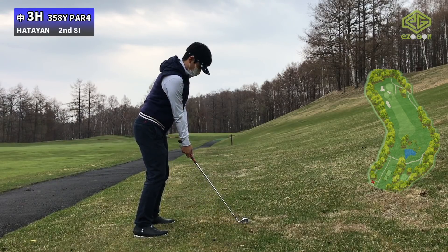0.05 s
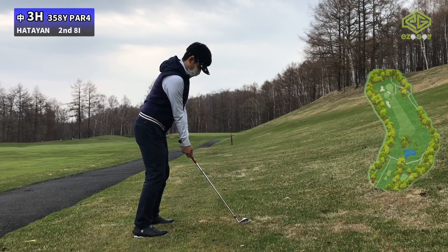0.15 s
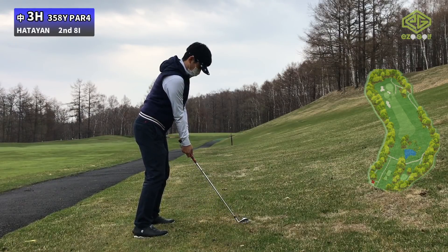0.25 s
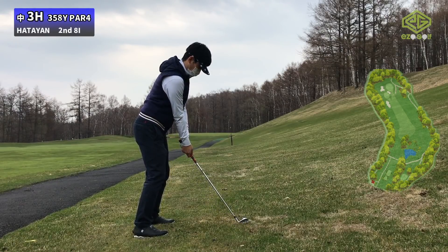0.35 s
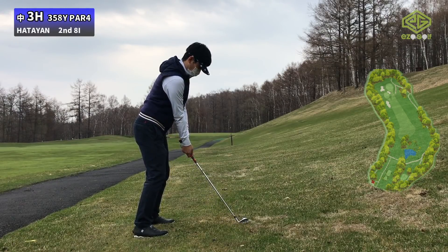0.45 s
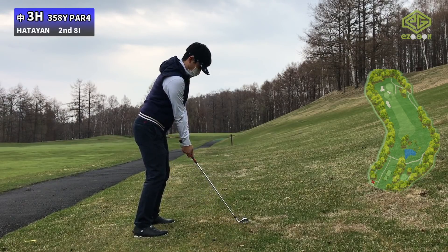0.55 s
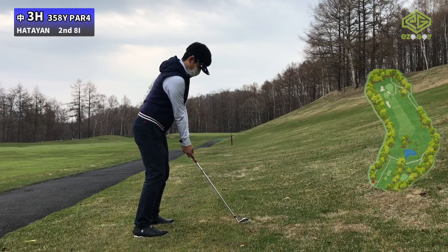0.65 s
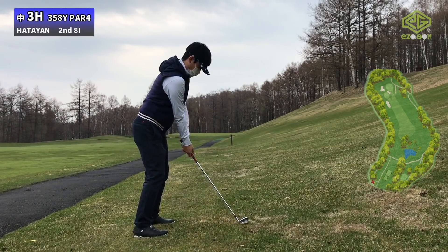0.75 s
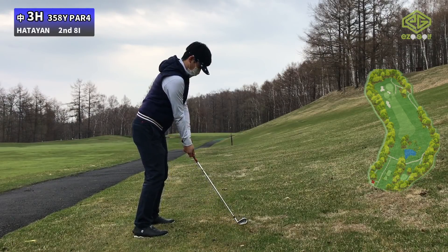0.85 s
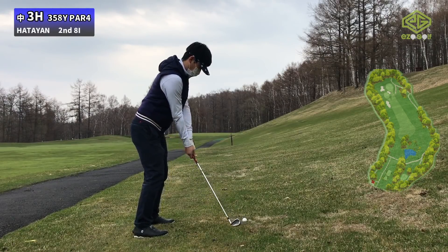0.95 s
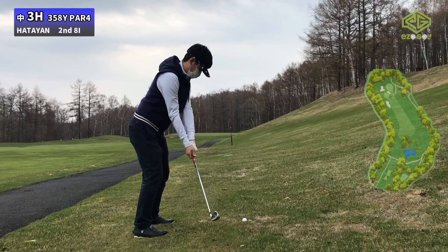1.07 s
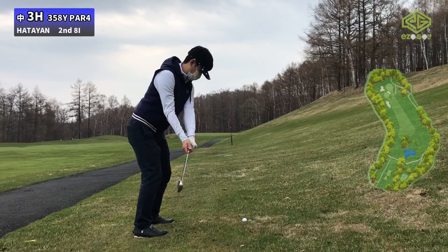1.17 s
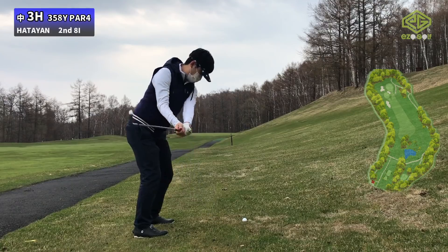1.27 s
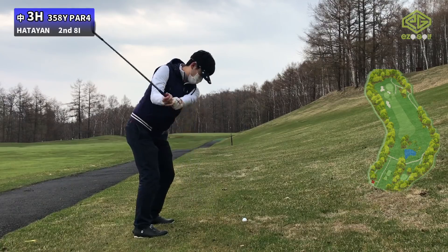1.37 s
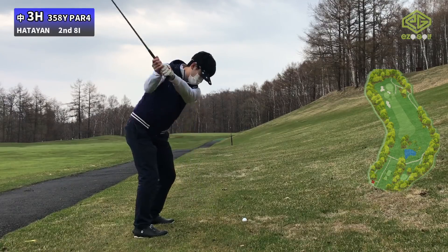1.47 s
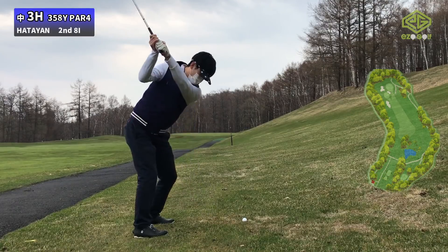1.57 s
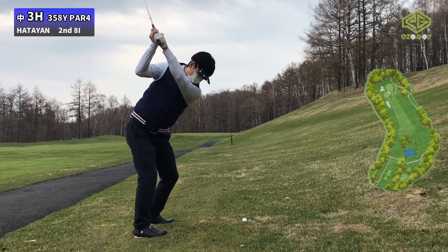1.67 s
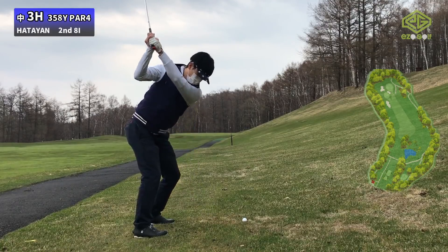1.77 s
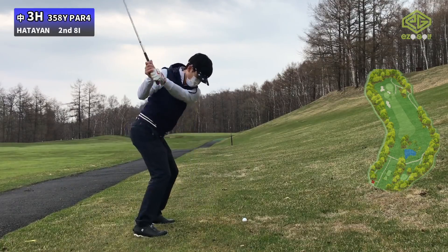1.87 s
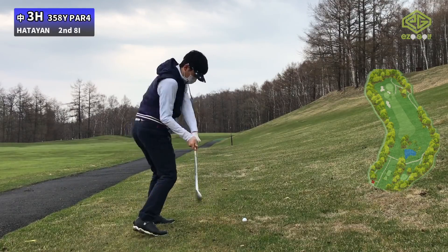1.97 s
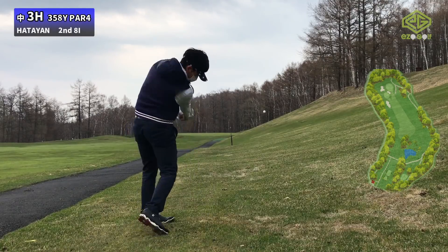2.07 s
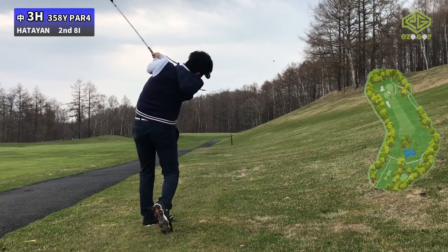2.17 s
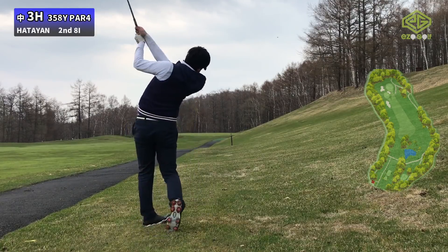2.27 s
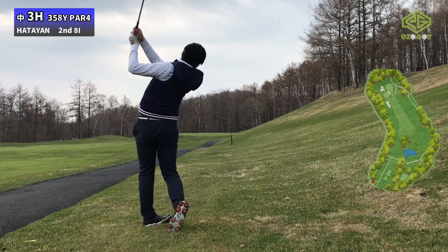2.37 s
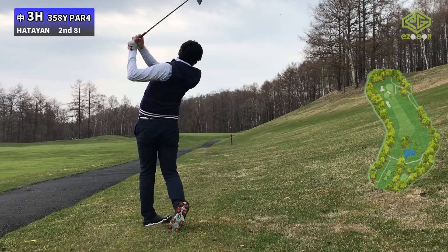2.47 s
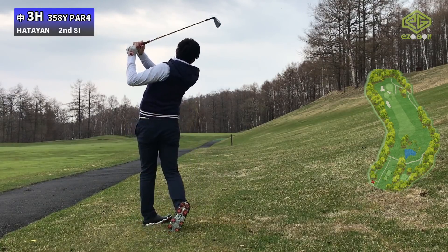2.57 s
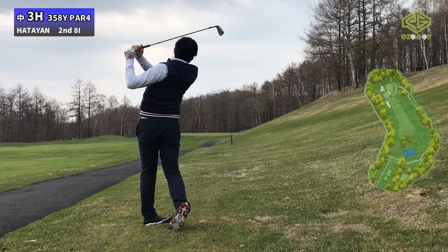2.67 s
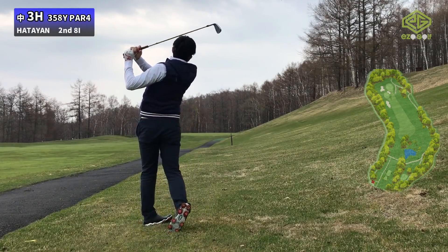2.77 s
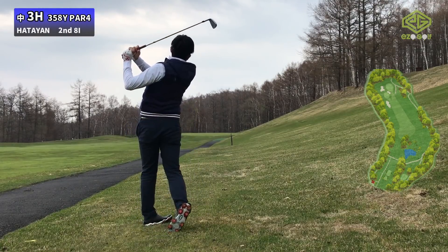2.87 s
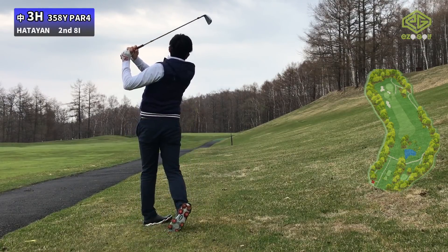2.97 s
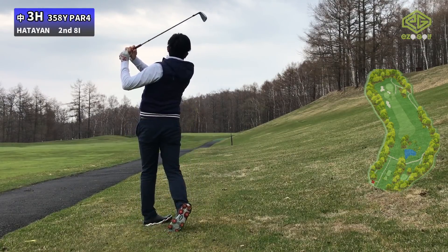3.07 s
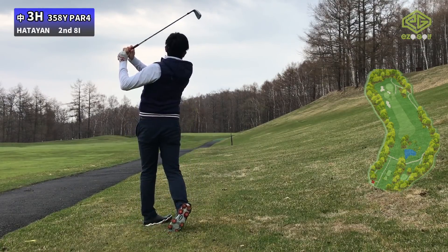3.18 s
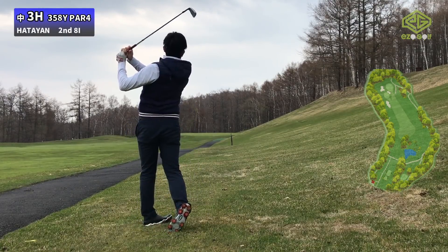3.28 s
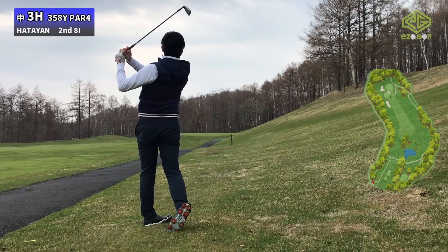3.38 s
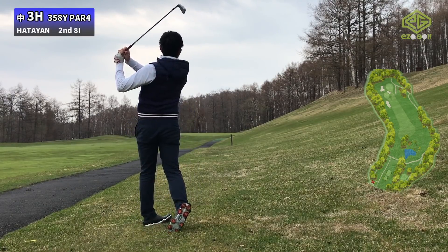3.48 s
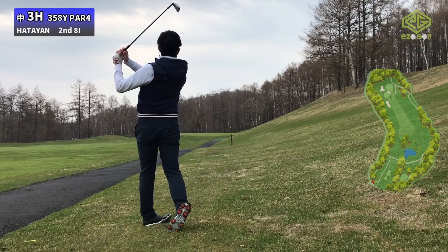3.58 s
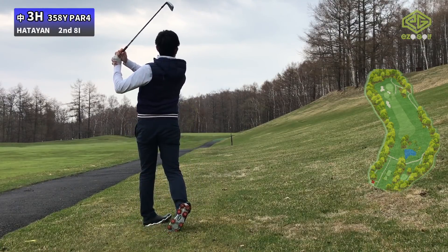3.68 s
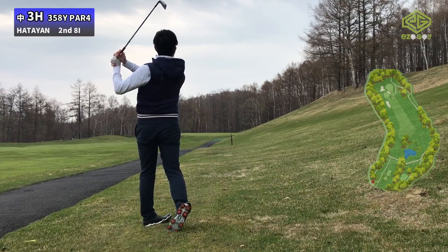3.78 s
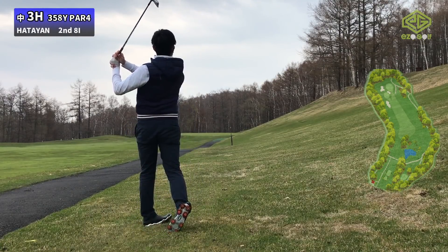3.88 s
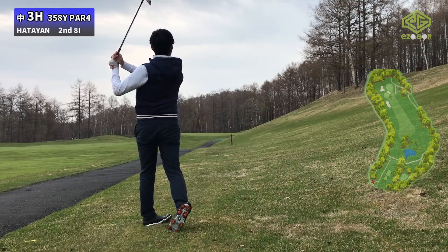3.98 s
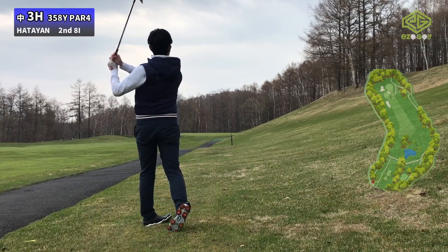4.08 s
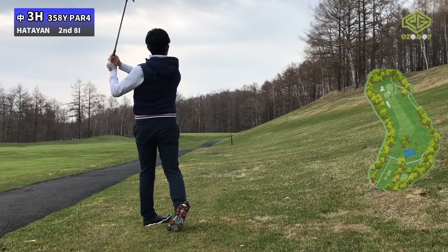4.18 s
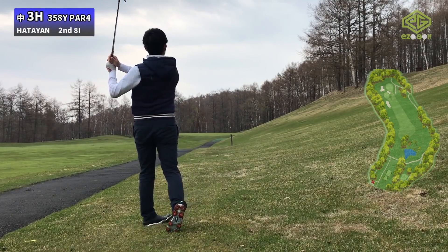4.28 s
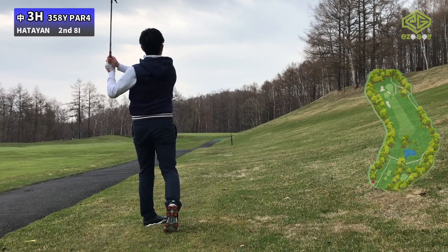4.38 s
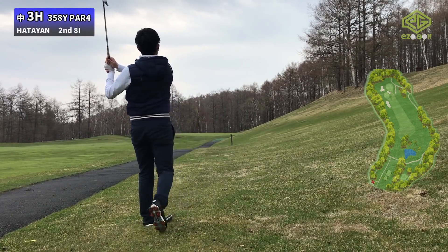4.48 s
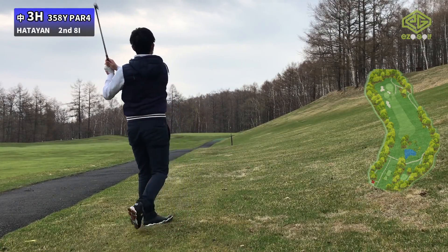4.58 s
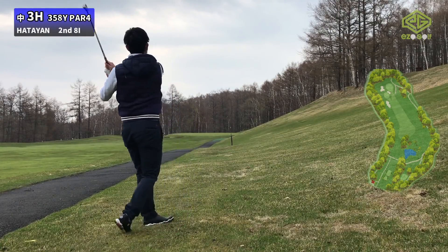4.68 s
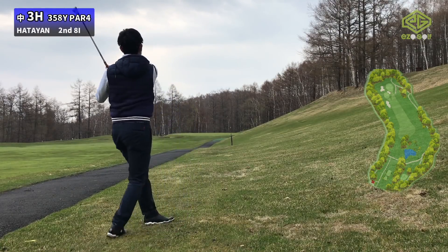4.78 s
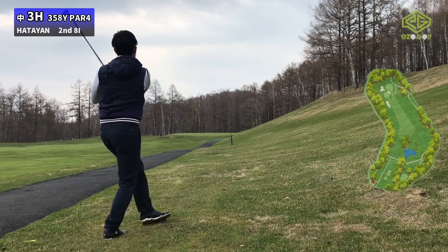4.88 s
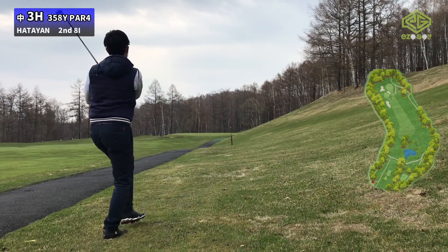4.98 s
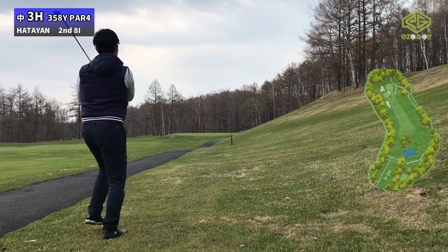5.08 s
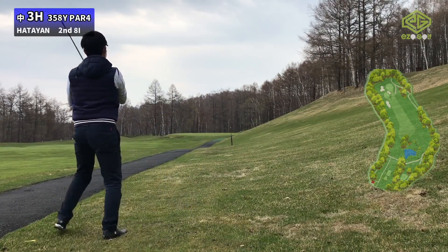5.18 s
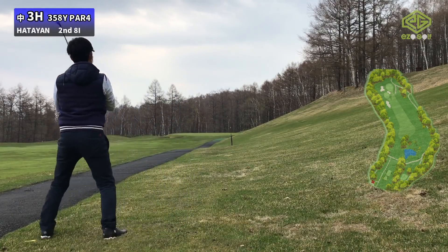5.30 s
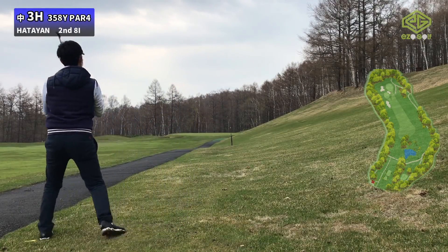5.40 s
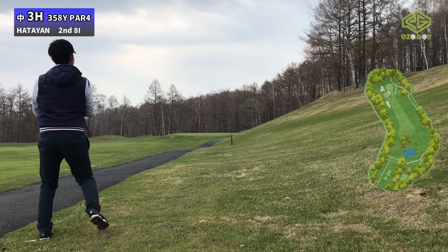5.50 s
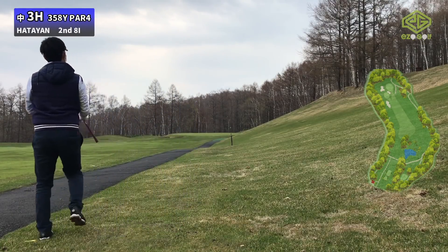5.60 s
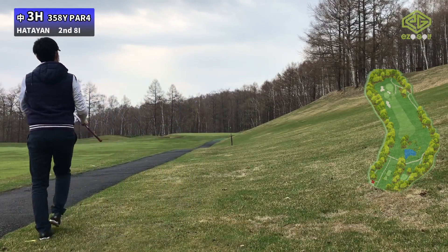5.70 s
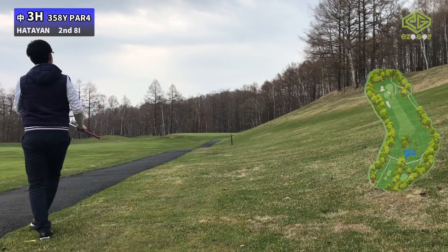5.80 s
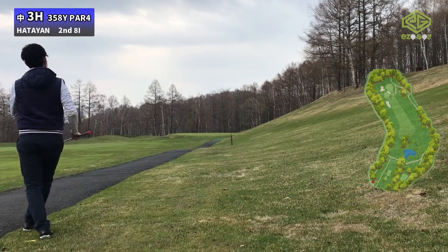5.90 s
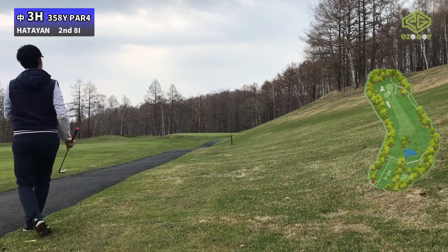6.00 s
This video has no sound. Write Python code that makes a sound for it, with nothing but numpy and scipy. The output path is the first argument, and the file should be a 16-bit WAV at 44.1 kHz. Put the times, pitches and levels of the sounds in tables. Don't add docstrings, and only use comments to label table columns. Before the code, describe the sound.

Open grassy slope, microphone a few metres from the golfer. A distant mowing engine throbs low with a thin wavering whine under soft airy hiss. Faint ticks and cloth rustle, the glove creaks, then a quick rising swish ends in one very loud, dry, clipped crack. Turf tears and scatters, a small club knock follows, and later light footsteps brush the grass.

```python
import sys
import numpy as np
from scipy import signal
from scipy.fft import rfft, irfft
from scipy.io import wavfile

SR = 44100
rng = np.random.default_rng(int(sys.argv[2]) if len(sys.argv) > 2 else 0)


def gain_from_decibels(decibels):
    exponent = np.asarray(decibels, float) / 20
    return 10 ** exponent


def put_to_file(sound):
    columns = np.atleast_2d(sound).T
    safe = np.clip(columns, -1, 1)
    whole_steps = np.round(safe * 32767)
    wavfile.write(sys.argv[1], SR, whole_steps.astype(np.int16))


N = 266716
TIME = np.arange(N) / SR


def rms_one(x):
    return x / np.sqrt(np.mean(x ** 2) + 1e-20)


def in_time(rows):
    s, *columns = np.transpose(rows)
    return [np.interp(TIME, s, column) for column in columns]


def drift(rate):
    r = np.exp(-80 * np.pi * rate / SR)
    white = rng.standard_normal(N // 40 + 2002)
    slow = signal.lfilter([1], [1, -2 * r, r * r], white)[2000:]
    return np.interp(np.arange(N) / 40, np.arange(len(slow)), rms_one(slow - slow.mean()))


def band(x, low_hz, high_hz):
    sos = signal.butter(2, [low_hz, min(high_hz, .45 * SR)], "band", fs=SR, output="sos")
    return signal.sosfilt(sos, x)


def coloured(white, spectrum):
    hz, level = np.transpose(spectrum)
    grid = np.maximum(np.fft.rfftfreq(N, 1 / SR), 1)
    inside = (grid >= hz[0]) * (grid <= hz[-1])
    gain = gain_from_decibels(np.interp(np.log(grid), np.log(hz), level)) * inside
    return rms_one(irfft(rfft(white) * gain, N))


def grains(per_s, spread_db):
    sizes = gain_from_decibels(spread_db * np.minimum(rng.exponential(1, N), 5)) * rng.choice([-1, 1], N)
    return sizes * (rng.random(N) < per_s / SR)


def swells(rows):
    return sum(gain_from_decibels(db) * np.exp(-((TIME - s) / half) ** 2) for s, db, half in rows)


def struck(rows):
    out = np.zeros(N)
    for s, hz, db, t60, contact in rows:
        start = round(s * SR)
        t = np.arange(start, round((s + 2 * t60) * SR) + 2) / SR - s
        t = np.maximum(t, 0)
        swell = 1 - np.exp(-t / max(contact, 1e-5))
        out[start:][:len(t)] += gain_from_decibels(db - 60 * t / t60) * swell * np.sin(2 * np.pi * hz * t)
    return out


def impact():
    # [t/s, f/Hz, peak level/dB, time to fall 60 dB/s, contact/s]
    face = [
        (2.15245, 6550, 14, 0.0049, .0006),
        (2.15245, 3400, 8, .0045, .0001),
        (2.15245, 4300, 0, .004, .0001),
        (2.15245, 3000, -6, .005, .0001),
        (2.1526, 9300, 3, .005, .0002),
        (2.1527, 12100, -4, 0.007, .0002),
        (2.1527, 17000, -2, .005, .0002),
    ]
    # [t/s, f/Hz, peak level/dB, time to fall 60 dB/s,
    # contact/s]
    ball_turf_and_echoes = [(2.1536, 1640, 20, 0.0049, .0015), (2.1551, 1190, 21, .0049, .003),
                            (2.1553, 3400, -4, 0.0081, .0002), (2.1551, 2700, -4, .008, .0002),
                            (2.1532, 7100, 3, .006, .0003), (2.1545, 4100, -9, .012, 0.0002005),
                            (2.1557, 860, -1.5, .012, 0.0013), (2.155, 420, -24, 0.02, .001),
                            (2.1535, 184, -24, 0.052, .002), (2.15, 110, -24, 0.053, .004),
                            (2.1622, 6500, -23, .014, .001), (2.1755, 6500, -30, .014, .001)]
    return struck(face) + struck(ball_turf_and_echoes)


def swish():
    # [t/s, level/dB, centre f/Hz]
    sweep = [
        (2.03, -73, 350),
        (2.082, -42, 450),
        (2.102, -36, 1000),
        (2.135, -35, 1800),
        (2.152, -31, 1500),
        (2.168, -33, 1300),
        (2.19, -45, 1200),
        (2.27, -53, 1150),
        (2.34, -67, 900),
    ]
    db, centre = in_time(sweep)
    white, out = rng.standard_normal((2, N)), np.zeros(N)
    for k, hz in enumerate(np.geomspace(300, 9000, 9)):
        octaves = np.log2(hz / centre)
        slope_db = np.where(octaves > 0, -6.5 * octaves, 3.2 * octaves)
        strip = rms_one(band(white[k % 2], hz / 1.27, hz * 1.27))
        out += gain_from_decibels(slope_db + 1.7 * drift(60)) * strip
    return gain_from_decibels(db - 6) * out * (db > db.min())


def cracks():
    # [t/s, level/dB, hold/s, time to fall 60 dB/s]
    tears = [
        (2.1482, -29, .004, .01),
        (2.1524, -14, .005, .013),
        (2.3729, -36, .004, .008),
    ]
    level = np.zeros(N)
    for s, db, hold, t60 in tears:
        t = TIME - s
        level += gain_from_decibels(db - 60 * np.clip(t - hold, 0, 1) / t60) * (t > 0)
    return level * rms_one(band(rng.standard_normal(N), 700, 15000))


def follow_through():
    # [t/s, f/Hz, peak level/dB, time to fall 60 dB/s, contact/s]
    knock = [(2.3729, 5460, -21, 0.00085, 0.000022), (2.3739, 4500, -21, .001, .00002),
             (2.3748, 8100, -20, .001, 0.000022), (2.37536, 4000, -15.5, 0.0025, .00002),
             (2.37538, 6560, -11.5, 0.0011, 0.000018), (2.37538, 9450, -14, 0.0009, .00002),
             (2.37538, 12500, -18, .001, 0.000018), (2.376, 5500, -27, .0015, .00002),
             (2.3774, 590, -26, .012, 0.00054), (2.3752, 483, -29, 0.018, .001),
             (2.3762, 1350, -34, .008, .0004), (2.3762, 2680, -33, 0.0069, .0002),
             (2.128, 545, -22, .035, 0.0018)]
    return -struck(knock)


def rustle():
    # [t at the peak/s, bright
    # level/dB, dull share/dB, time to fade 10 dB/s]
    slow_rise = [(1.4, -67, 0, .5), (1.455, -65, 6, .04), (1.6, -66, 3, .2), (2.0, -64, 3, .2),
                 (2.5, -50.5, -2, .07), (2.555, -49.5, -4, .022), (2.7, -63, 3, .2), (3.575, -71, 6, .03),
                 (3.65, -67, -4, .035), (4.75, -72, 4, .4), (5.5, -63, -4, .05), (6.05, -65.5, -2, .45)]
    turf = [
        (2.06, -61, -4, .05),
        (2.126, -45, 5, .05),
        (2.165, -37, -4, .025),
        (2.23, -52, -2, .2),
        (2.28, -54.5, -2, .25),
        (2.385, -52.5, 0, .08),
    ]
    steps = [
        (4.85, -59, 0, .04),
        (4.92, -62.5, -2, .06),
        (5.0, -63.5, 0, .12),
        (5.135, -70, 8, .03),
        (5.37, -56.5, -13, .06),
        (5.425, -60, 2, .04),
        (5.585, -55.5, -9, .045),
        (5.62, -64, 5, .03),
    ]
    # [f/Hz, level/dB per Hz]
    colour = [(2650, -31.5), (4500, -1.5), (4980, -1.5), (8370, -1.5), (10600, -5), (12100, -1.5),
              (15200, -6), (16000, -9.5)]
    bright = coloured(grains(9000, spread_db=3.0), colour)
    dull = rms_one(band(grains(6000, spread_db=3.5), 1800, 5000))
    power = np.zeros((2, N))
    for rows, rise in ((slow_rise, 1.1), (turf, .45), (steps, .6)):
        for s, db, dull_db, fade in rows:
            away = np.where(TIME < s, (s - TIME) / rise, TIME - s) / fade
            power += gain_from_decibels(db - 10 * away + [[0], [dull_db]]) ** 2
    return np.sqrt(power[0]) * bright + np.sqrt(power[1]) * dull


def clockwork():
    beats = []
    for k in range(6):
        s, db = .6574 + 1.00417 * k, -28.5 + .9 * k
        beats += [(s, db, 12000), (s + .108, db - 7.5, 12000)]
    return beats


def ticks():
    # [t/s, level/dB]
    creaks = [(1.7464, -11), (1.7642, -14.5), (1.7743, -26), (1.7907, -16), (1.8301, -19), (1.841, -21),
              (1.8558, -29), (1.8818, -24), (1.9143, -25), (1.9206, -25), (1.9273, -27), (1.9339, -23),
              (1.9444, -25)]
    # [t/s, level/dB, centre f/Hz]
    snaps = [(.8522, -19, 3400), (1.2502, -20, 3800), (1.355, -22, 11000), (1.4507, -21, 3500),
             (1.4601, -31, 5500), (1.8108, -26, 5600), (1.9786, -21, 5600), (2.0567, -21, 5400),
             (2.0694, -22, 4800), (2.1004, -20, 3900), (2.3943, -22, 5300), (2.4259, -16, 6400),
             (2.5146, -13, 3300), (2.5344, -30, 8000), (2.6379, -20, 3200), (4.2897, -38, 13000),
             (4.605, -30, 5500), (4.7952, -30, 6000), (4.838, -32, 8500), (4.9806, -31, 5000),
             (5.0494, -25, 3400), (5.4159, -18, 11500), (5.5395, -25, 8000), (5.5865, -20, 10500)]
    slips = [(s, db, 3900) for s, db in creaks]
    s, db, hz = np.transpose(clockwork() + list(snaps) + slips)
    out, at = np.zeros(N), np.round(s * SR).astype(int)
    for low, high in ((2700, 5500), (4800, 7800), (10500, 16000)):
        octaves = np.abs(np.log2(hz / np.sqrt(low * high)))
        clicks = np.full(N, 1e-18)
        clicks[at] = gain_from_decibels(db - 14 * octaves)
        out += band(clicks, low, high)
    return out


def scuffs():
    # [t at the middle/s, low f/Hz, high f/Hz, level/dB, half length/s]
    rubs = [(1.46, 500, 2000, -50, 0.007), (2.012, 12800, 14500, -62, .018), (2.45, 230, 600, -53, .05),
            (3.57, 2900, 3900, -56, .012), (3.645, 12800, 14800, -65, .015), (4.715, 1800, 2700, -54, .02),
            (4.76, 1796, 2600, -55, .008), (2.1, 500, 1800, -38, .004), (5.62, 3000, 4500, -58, .015),
            (5.126, 3300, 4500, -50, 0.0084), (5.425, 5000, 7000, -59, .015),
            (5.64, 12490, 14980, -65, .02), (6.025, 12810, 14470, -64, .025)]
    out, grit = np.zeros(N), grains(5000, spread_db=3.5)
    for s, low_hz, high_hz, db, half in rubs:
        out += swells([(s, db, half)]) * rms_one(band(grit, low_hz, high_hz))
    return out


def engine_throb(turns):
    # [multiple of the turn rate, level/dB, growth/dB per s]
    orders = [(1, -63, 0), (3, -38, 0), (4, -51.5, 0.5), (5, -52, 0), (6, -54.5, 1.28), (8, -65.5, 0),
              (9, -70, .6)]
    neighbour = .197 + (58.396 - .07 * TIME / 2) * TIME
    out = np.sqrt(2) * gain_from_decibels(-43.5) * (np.sin(2 * np.pi * 2 * turns) - np.sin(2 * np.pi * neighbour))
    for order, db, growth in orders:
        level = gain_from_decibels(db + growth * TIME + 2.0 * drift(3))
        out += np.sqrt(2) * level * np.sin(2 * np.pi * (int(round(order)) * turns + rng.random()))
    return out


def exhaust(turns):
    # [f/Hz, level/dB per Hz]
    rumble = [(20, -39), (27, -27), (38, -18), (48, -13), (70, -7), (82, -5.5), (103, 0), (120, -2.5),
              (135, -8.5), (165, -16), (210, -17), (260, -24), (320, -27), (480, -37)]
    puff = 1 + .3 * np.cos(2 * np.pi * turns)
    return gain_from_decibels(-39) * puff * coloured(rng.standard_normal(N), rumble)


def valve_ticks(turns):
    # [f/Hz, width/Hz, level/dB, ticks per turn]
    valves = [
        (9550, 550, -35.5, 2),
        (12600, 750, -31.5, .5),
        (13900, 750, -32.5, .5),
    ]
    out = np.zeros(N)
    for hz, width_hz, db, per_turn in valves:
        count = np.floor(per_turn * turns + .7 + .12 * per_turn * drift(30))
        closes = np.diff(count, prepend=0) > 0
        uneven_db = 2.0 * drift(2) + 4.0 * np.clip(rng.standard_normal(N), -3, 1.2)
        out += band(closes * gain_from_decibels(db + uneven_db) + 1e-18, hz - width_hz / 2, hz + width_hz / 2)
    return out


def gear_whine(turns):
    # [t at the middle/s, level/dB, half length/s]
    gusts = [(.1, -52, .05), (.42, -53, .12), (.6, -53, .06), (.89, -56, .08), (1.25, -56, .04),
             (1.55, -60, .15), (1.79, -54, .04), (1.94, -58, .03), (2.51, -55, .04), (2.64, -60, .05),
             (2.87, -56, .06), (3.1, -60, .1), (3.46, -55, .08), (3.76, -52.5, .12), (4.1, -55, .08),
             (4.36, -53, .07), (4.57, -53, .08), (4.92, -58, .14), (5.32, -53.5, .08), (5.53, -52.5, .1),
             (5.78, -55, .07), (5.97, -56, .1)]
    carried = gain_from_decibels(-66) + swells(gusts)
    phase = 2 * np.pi * (50 * turns + np.cumsum(2.5 * drift(40)) / SR)
    octave = gain_from_decibels(-19) * np.sin(2 * phase)
    side_line = gain_from_decibels(-11) * np.sin(phase + 4 * np.pi * turns)
    flutter = gain_from_decibels(-2.5 + 1.4 * drift(25))
    return np.sqrt(2) * carried * flutter * (np.sin(phase) + octave + side_line)


def engine():
    # [t/s, speed/turns per s]
    speed = [(0, 29.85), (.6, 29.7), (1.3, 29.6), (2, 29.65), (2.8, 29.8), (3.5, 29.85), (4.3, 29.82),
             (6.05, 29.92)]
    turns = np.cumsum(in_time(speed)[0]) / SR
    return engine_throb(turns) + exhaust(turns) + valve_ticks(turns) + gear_whine(turns)


def air():
    # [f/Hz, level/dB per Hz]
    hiss = [(300, -6), (420, -4), (520, -2), (1000, 0.5), (1400, 1), (1750, -3), (3000, -7), (4400, -11),
            (4950, -17), (6800, -18), (7800, -23), (9500, -21.5), (10500, -23), (16000, -21)]
    return gain_from_decibels(-52 + .6 * drift(4)) * coloured(rng.standard_normal(N), hiss)


def scene():
    stroke = swish() + impact() + cracks() + follow_through()
    player = rustle() + ticks() + scuffs()
    return (stroke + player + engine() + air())[None]


def top_cut(x):
    return signal.sosfilt(signal.butter(12, 16570, fs=SR, output="sos"), x)


def record(dry):
    overloaded = np.clip(dry, -.95, .95)
    low_pass = signal.cheby2(24, 60, 16060, fs=SR, output="sos")
    return top_cut(signal.sosfilt(low_pass, overloaded))


dry = scene()
out = record(dry)
put_to_file(out)
```